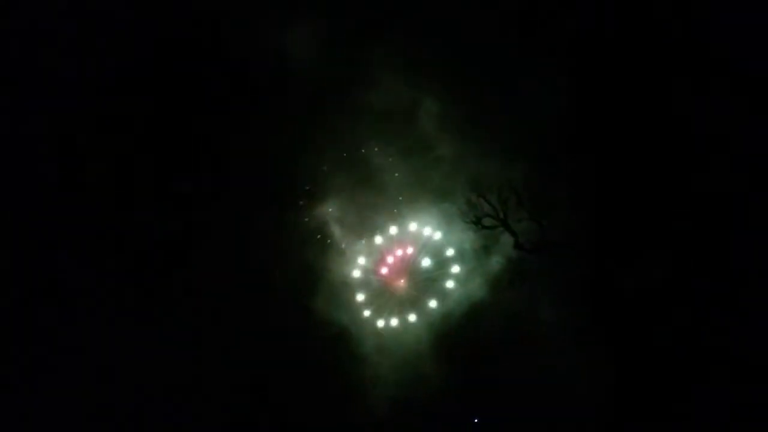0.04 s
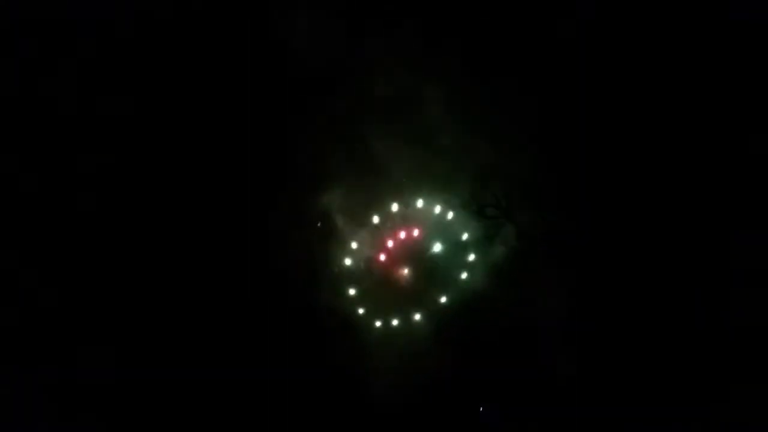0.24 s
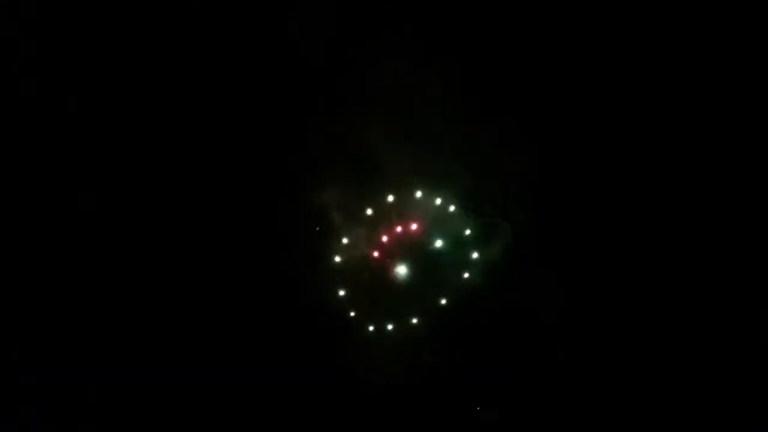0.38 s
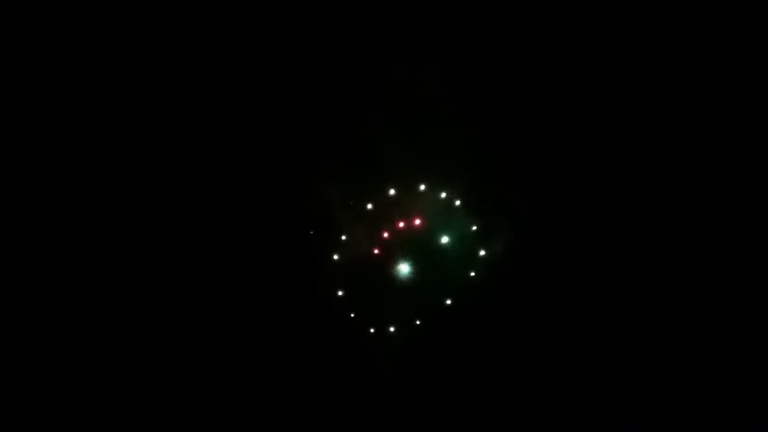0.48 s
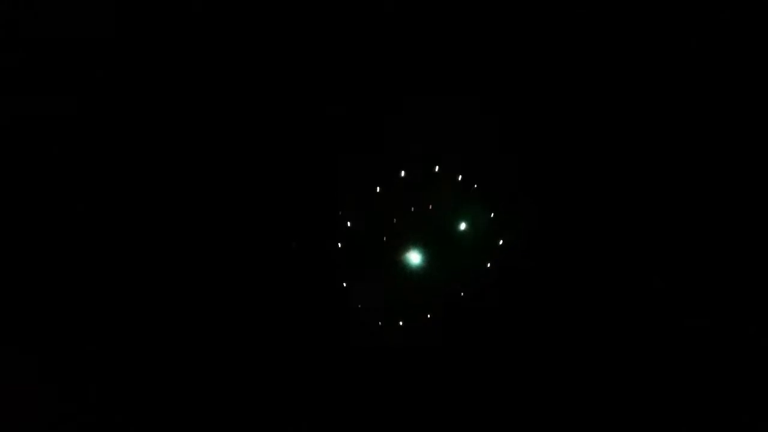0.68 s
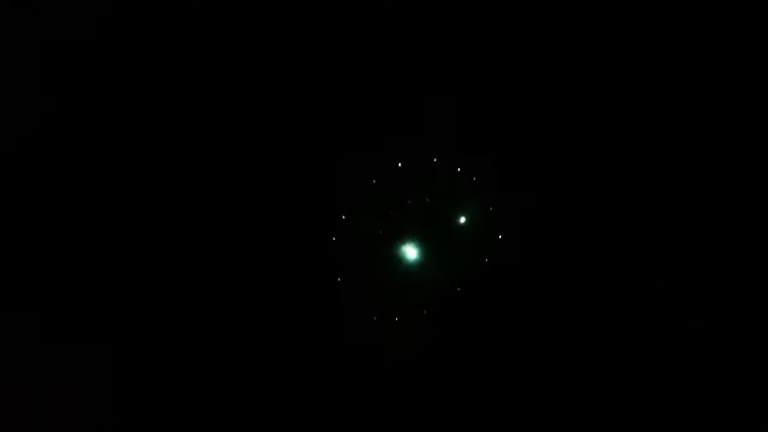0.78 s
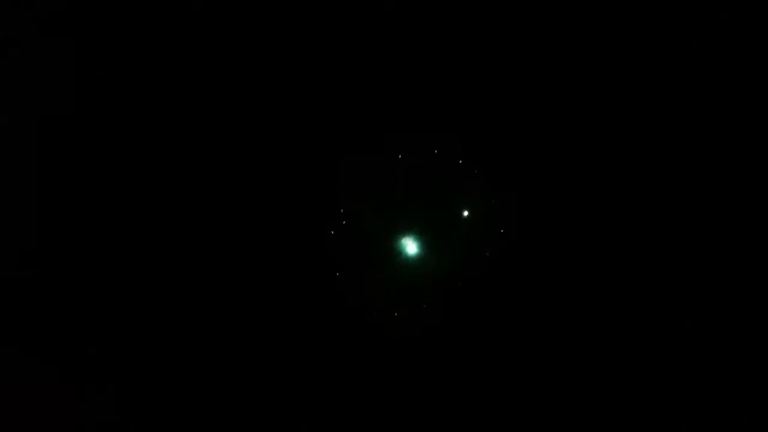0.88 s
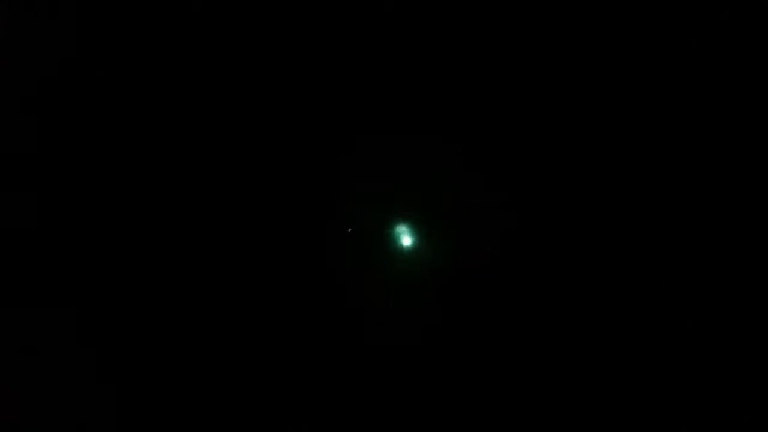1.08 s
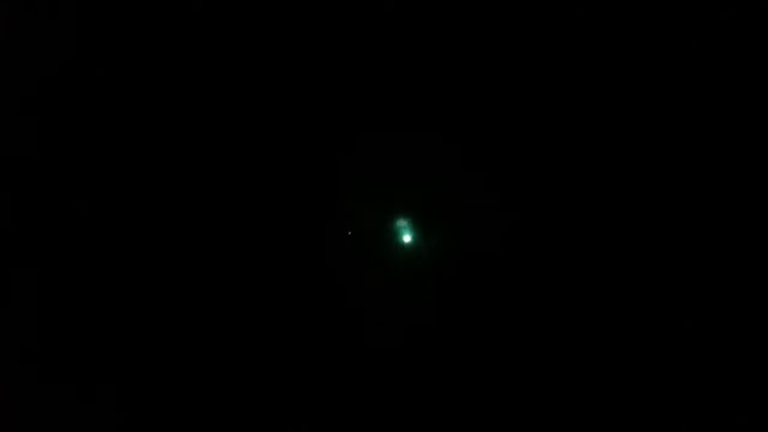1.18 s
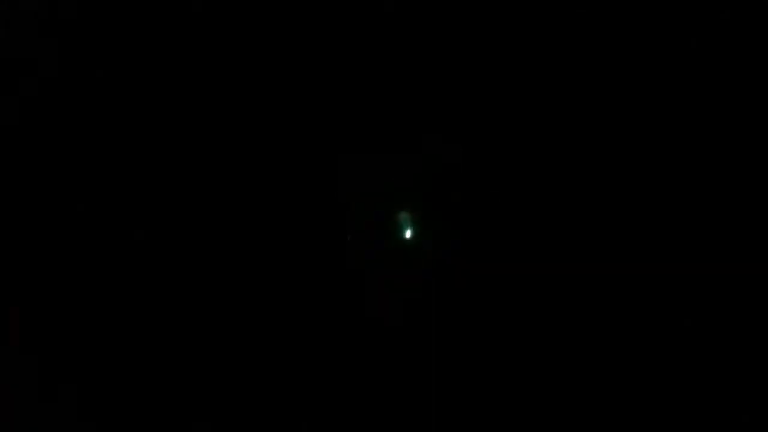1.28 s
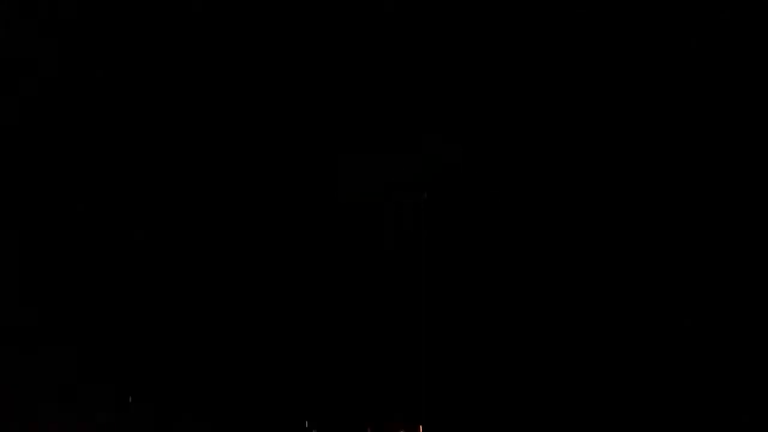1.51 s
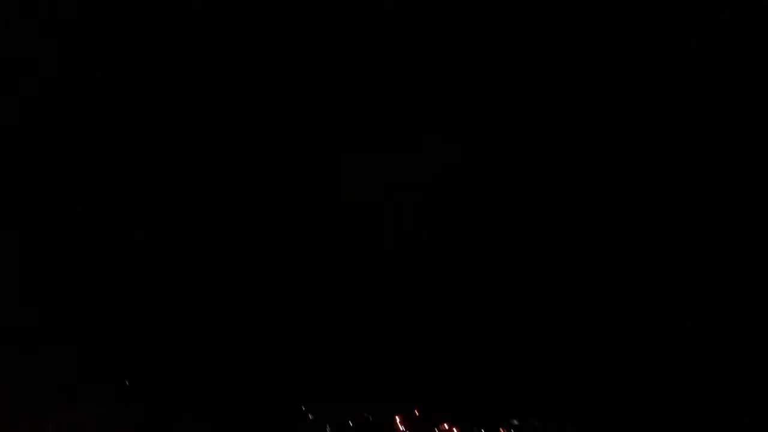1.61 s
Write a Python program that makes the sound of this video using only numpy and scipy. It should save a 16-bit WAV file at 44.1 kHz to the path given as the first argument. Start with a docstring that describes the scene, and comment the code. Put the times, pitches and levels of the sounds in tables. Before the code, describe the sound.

A firework bang outdoors at night. Faint air and distant traffic until 0.2 s, then a violent, punchy blast with ground bounce and crackling slap echoes until about 0.32 s, slightly clipped by a small microphone. A lumpy roll returns from the slopes, losing treble and fading through 1.5 s. Two dull, quiet far bangs follow at about 1.56 and 1.61 s.

```python
"""Faint night in a valley for a fifth of a second, then a firework shell bursts: blast wave and ground bounce.
Slaps from walls nearby follow; pushes swing into suction, and sharp edges carry short sprays of noise.
Noise bands roll back from the slopes, duller with distance; two dull noise bursts are far bangs, come late.
Far traffic and air are steady noise. A small microphone rings near 6 kHz, its electronics hiss, and the
gain control ducks just ahead of the overload and recovers slowly."""
import sys
import numpy as np
from scipy import signal
from scipy.io import wavfile
from scipy.ndimage import uniform_filter1d, minimum_filter1d

SR = 44100
rng = np.random.default_rng(int(sys.argv[2]) if len(sys.argv) > 2 else 0)


def rack_gain(trim_db):
    """Turn a fader trim in dB into the linear factor to multiply a signal by."""
    fader = np.asarray(trim_db, float)
    return 10 ** (fader / 20)


def store_pcm(level_fs):
    """Save levels as 16-bit WAV."""
    pcm = np.round(np.clip(level_fs, -1, 1) * 32767).astype(np.int16)
    wavfile.write(sys.argv[1], SR, np.atleast_2d(pcm).T)


N = 72765

# low pressure pushes of the blast and its strong echoes:
# start_s, level_db, push_ms, polarity (1 = waveform goes down first)
THUMPS = [(.2024, 21.5, 3.6, 1), (.2085, 23, 5.0, 1), (.2370, 9, 1.5, 1), (.2569, 16, .7, -1),
          (.2609, 14, 1.0, -1), (.2843, 18.5, 2.4, 1), (.3078, 11.5, 1.6, 1), (.3197, 11.5, 1.5, -1),
          (.965, -13, .8, -1)]
# sharp edges, each with a short spray of scatter: start_s, edge_level_db, edge_cut_hz, spray_level_db
CRACKS = [(.2025, 19.5, 7000, -7), (.2079, 12, 3000, -6), (.2570, 14, 6500, -4), (.2640, -4, 7000, -8),
          (.2832, 23, 7000, -8), (.3185, -8, 3000, -12), (.3735, 3, 7500, -20)]
# scattered echoes off trees, houses and slopes: time_s, level_db, extra_bass_db, extra_treble_db
ROLL = [(.204, 5, -6, 0), (.216, 6, -5, 0), (.226, 5, -2, 0), (.236, 6, 0, 2), (.248, 1, 2, 0),
        (.262, 7, 0, 0), (.276, -1, -2, 0), (.292, 3, 0, -1), (.32, 3, 0, 0), (.352, -1, -2, 2),
        (.40, -6, -5, 3), (.45, -7, -3, 4), (.55, -11, -5, 4), (.61, -15, -7, 3), (.66, -14, -2, 3),
        (.73, -18, -8, 3), (.82, -15, -6, 1), (.98, -14, -8, -1), (1.1, -16, -6, -2), (1.2, -19, -3, -3),
        (1.38, -23, 2, -5), (1.5, -22, 0, -6), (1.65, -22, 0, -5)]
# colour of the roll from nearby: pitch_hz, level_db (per Hz)
NEAR_COLOUR = [(30, 15), (50, 29), (80, 13), (160, 15.5), (240, 9), (310, 8.5), (400, -2), (550, 3),
               (800, -4.5), (1200, -4.5), (2500, -14), (5000, -24.5), (9000, -28), (16000, -22)]
# colour of the roll from the far slopes: pitch_hz, level_db (per Hz)
FAR_COLOUR = [(30, 8), (50, -5), (80, 2), (130, 4.5), (240, 10), (310, 3.5), (400, 0), (580, 1.5),
              (800, -5.5), (1100, -7.5), (2500, -11.5), (5000, -24.5), (9000, -12), (16000, -34)]
# far bangs, soft and dull: start_s, level_db
FAR_BANGS = [(1.559, -21), (1.614, -20.5)]
# colour of the night background: pitch_hz, level_db (per Hz, before NIGHT_DB)
NIGHT_COLOUR = [(30, 11), (55, 47), (88, 14.5), (160, 3.5), (300, 7), (600, -0.5), (1050, 7.5), (1600, -5),
                (3000, -14.5), (6000, -74), (10000, -76.5), (16000, -24)]

THUMP_CUT_HZ = 900
SPRAY_T60_S, SPRAY_LOW_HZ = 0.013, 500
FAR_FROM_S, FAR_BY_S = 0.4, 1  # near colour gives way to far between these times
AIR_LOSS_DB_PER_S, AIR_LOSS_POWER = 30.5, 1.33  # at 6 kHz; growth with pitch
LUMP_DB, LUMP_RATE_HZ = 1, 20
BAND_FLICKER_DB, BAND_FLICKER_RATE_HZ = 0.5, 38.0
BASS_TOP_HZ, TREBLE_FROM_HZ, ROLL_RISE_S = 270, 5000, 0.012
FAR_BANG_T60_S, FAR_BANG_CUT_HZ, FAR_BANG_RISE_S = 0.09, 1250, 0.002
NIGHT_DB = -45.5
PORT_HZ, PORT_Q, BASS_CUT_HZ = 5950, 7.5, 100
HISS_DB = -74  # electronics, white, ahead of the gain control
LIMIT_DB, MOST_DUCK_DB = -6.0, 13.0
LOOKAHEAD_S, RELEASE_DB_PER_S = 0.028, 2.5
LOPSIDED, TOP = 0.12, 0.9  # share of even distortion; clipping ceiling
TREBLE_CUT_HZ = 16700


def place(out, start_s, sound):
    """Add a sound to the timeline at its arrival time."""
    out[int(start_s * SR):][:len(sound)] += sound


def thumps():
    """Blast wave, bounce and slaps: each pressure push swings into suction and dies away."""
    out, t = np.zeros(N + 6000), np.arange(5000) / SR
    for start_s, level_db, push_ms, polarity in THUMPS:
        u = t / (push_ms / 1000)
        push = -polarity * rack_gain(level_db) * (1 - u) * np.exp(-u)
        place(out, start_s, signal.lfilter(*signal.butter(2, THUMP_CUT_HZ, fs=SR), push))
    return out[:N]


def cracks():
    """Sharp fronts: a one-sample edge and a fast-fading spray of noise, dulled together."""
    out, t = np.zeros(N + 6000), np.arange(5000) / SR
    for start_s, edge_db, edge_hz, spray_db in CRACKS:
        noise = rng.standard_normal(len(t))
        spray = signal.lfilter(*signal.butter(1, SPRAY_LOW_HZ, "high", fs=SR), noise)
        spray = spray * rack_gain(spray_db - 60 * t / SPRAY_T60_S)
        edge = rack_gain(edge_db) * (t == 0) + spray
        place(out, start_s, signal.lfilter(*signal.butter(3, edge_hz, fs=SR), edge))
    return out[:N]


def at_hz(points, hz):
    """Read a spectrum on a log pitch axis."""
    points_hz, level_db = np.transpose(points)
    return np.interp(np.log(hz), np.log(points_hz), level_db)


def drift(rate_hz):
    """Slow random wander, rms 1: noise through two equal low-pass poles."""
    # made at an eighth of the sample rate, with the filter's start-up dropped
    r = np.exp(-16 * np.pi * rate_hz / SR)
    slow = signal.lfilter([1], [1, -2 * r, r * r], rng.standard_normal(N // 8 + 4002))[4000:]
    slow = slow / np.sqrt(np.mean(slow ** 2) + 1e-20)
    return np.interp(np.arange(N) / 8, np.arange(len(slow)), slow)


def bands():
    """Third-octave bands of noise, flat per Hz, with their centres in Hz."""
    edges = 28 * 2 ** np.arange(0, 9.5, 1 / 3)
    white = rng.standard_normal((2, N + 4000))  # neighbouring bands take different noise
    out = []
    for k, (low, high) in enumerate(zip(edges, edges[1:])):
        band_pass = signal.butter(2, [low, high], "band", fs=SR, output="sos")
        out.append(signal.sosfilt(band_pass, white[k % 2])[-N:])
    return np.sqrt(edges[1:] * edges[:-1]), np.array(out)


def roll():
    """Lumpy scattered echoes; near colour gives way to far, and air takes the treble over longer paths."""
    t = np.arange(N) / SR
    time_s, level_db, bass_db, treble_db = np.transpose(ROLL)
    age = np.maximum(t - THUMPS[0][0], 0)  # seconds since the blast arrived
    far = np.clip((t - FAR_FROM_S) / (FAR_BY_S - FAR_FROM_S), 0, 1)
    shared = np.interp(t, time_s, level_db) + LUMP_DB * drift(LUMP_RATE_HZ)
    bass = np.interp(t, time_s, bass_db)
    treble = np.interp(t, time_s, treble_db)
    out = 0
    for hz, band in zip(*bands()):
        colour = (1 - far) * at_hz(NEAR_COLOUR, hz) + far * at_hz(FAR_COLOUR, hz)
        tilt = bass / (1 + (hz / BASS_TOP_HZ) ** 2) + treble / (1 + (TREBLE_FROM_HZ / hz) ** 2)
        loss = AIR_LOSS_DB_PER_S * (hz / 6000) ** AIR_LOSS_POWER * age
        flicker = BAND_FLICKER_DB * drift(BAND_FLICKER_RATE_HZ)
        out = out + rack_gain(shared + colour + tilt - loss + flicker) * band
    return out * np.clip(age / ROLL_RISE_S, 0, 1)


def far_bangs():
    """Two late bangs from far off: noise with a soft rise and short decay, its treble cut away."""
    out, t = np.zeros(N + 6000), np.arange(5000) / SR
    for start_s, level_db in FAR_BANGS:
        burst = rng.standard_normal(len(t)) * rack_gain(level_db - 60 * t / FAR_BANG_T60_S)
        burst = burst * np.minimum(t / FAR_BANG_RISE_S, 1)
        place(out, start_s, signal.lfilter(*signal.butter(3, FAR_BANG_CUT_HZ, fs=SR), burst))
    return out[:N]


def night():
    """Far traffic and air: steady noise, coloured band by band."""
    return sum(rack_gain(NIGHT_DB + at_hz(NIGHT_COLOUR, hz)) * band for hz, band in zip(*bands()))


def scene():
    """All sources at the microphone, one channel."""
    return (thumps() + cracks() + far_bangs() + roll() + night())[None]


def port_resonance(x):
    """The small microphone's port rings: a two-pole resonance with unit gain in the deep bass."""
    r = np.exp(-np.pi * PORT_HZ / PORT_Q / SR)
    a = [1, -2 * r * np.cos(2 * np.pi * PORT_HZ / SR), r * r]
    return signal.lfilter([sum(a)], a, x)


def gain_control(x):
    """Look-ahead limiter: ducks before each overload, then recovers at a steady rate in dB."""
    over = np.clip(20 * np.log10(np.abs(x) + 1e-9) - LIMIT_DB, 0, MOST_DUCK_DB)
    ramp = RELEASE_DB_PER_S * np.arange(N) / SR
    held = np.maximum(np.maximum.accumulate(over + ramp) - ramp, 0)
    ahead = int(LOOKAHEAD_S * SR) | 1  # odd window length
    # greatest duck needed in the window to come, then averaged over the window just past
    early = -minimum_filter1d(-held, size=ahead, origin=-(ahead // 2))
    return x * rack_gain(-uniform_filter1d(early, size=ahead, origin=ahead // 2))


def overload(x):
    """Lopsided capsule adds even distortion in the treble; the peaks then clip with a rounded knee."""
    treble = signal.butter(2, 3000, "high", fs=SR, output="sos")
    x = x + LOPSIDED * signal.sosfilt(treble, np.tanh(x) ** 2)
    return x / (1 + np.abs(x / TOP) ** 8.0) ** (1 / 8.0)


def top_cut(x):
    """Nothing passes above the cut-off."""
    return signal.sosfilt(signal.butter(12, 16850, fs=SR, output="sos"), x)


def record(dry):
    """Microphone chain: port ring, bass cut, hiss, gain control, overload and a steep treble cut."""
    run_in = dry[0, 4000:0:-1]  # mirrored opening settles the filters
    x = port_resonance(np.r_[run_in, dry[0]])
    x = signal.sosfilt(signal.butter(4, BASS_CUT_HZ, "high", fs=SR, output="sos"), x)[-N:]
    x = x + rack_gain(HISS_DB) * rng.standard_normal(N)
    x = overload(gain_control(x))
    x = signal.sosfilt(signal.cheby2(10, 50, TREBLE_CUT_HZ, fs=SR, output="sos"), x)
    return top_cut(x[None])


dry = scene()
out = record(dry)
store_pcm(out)
```